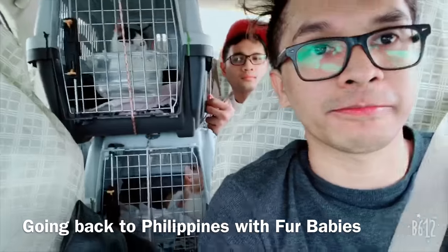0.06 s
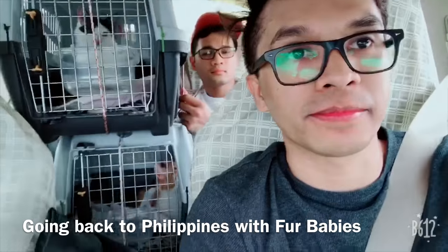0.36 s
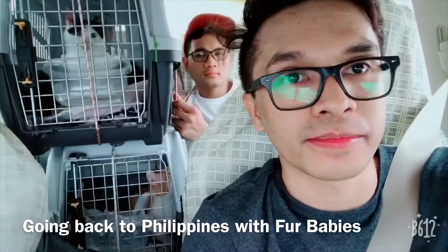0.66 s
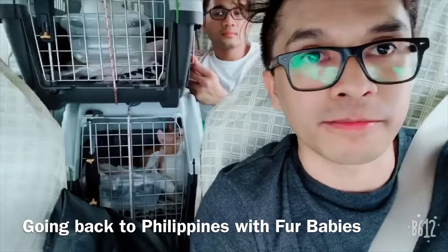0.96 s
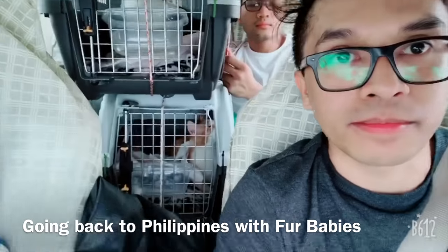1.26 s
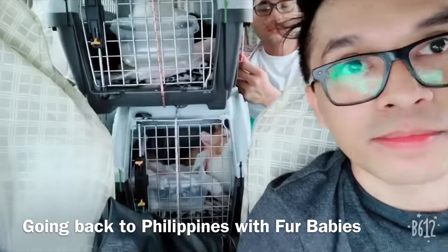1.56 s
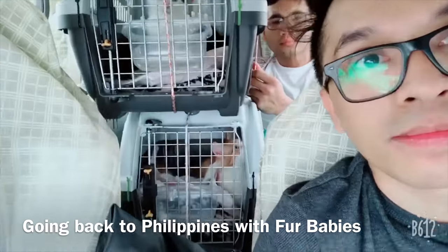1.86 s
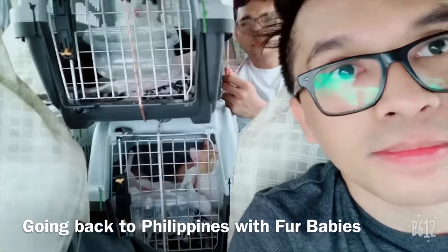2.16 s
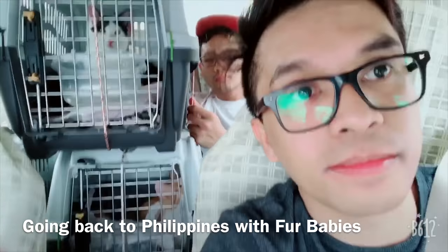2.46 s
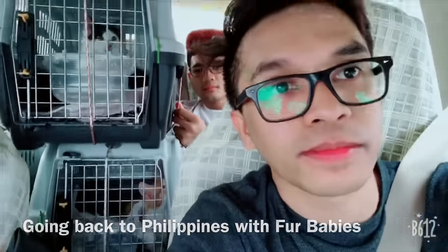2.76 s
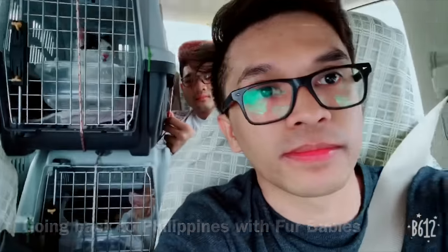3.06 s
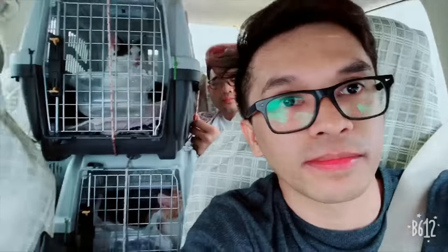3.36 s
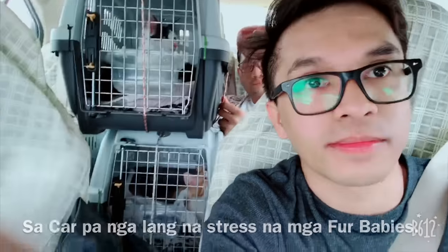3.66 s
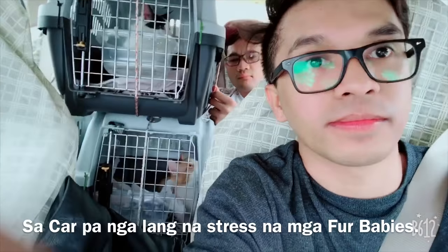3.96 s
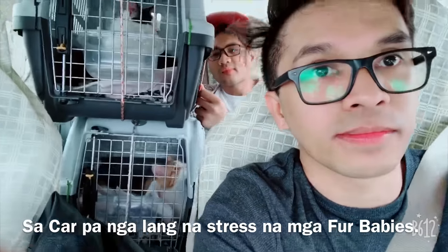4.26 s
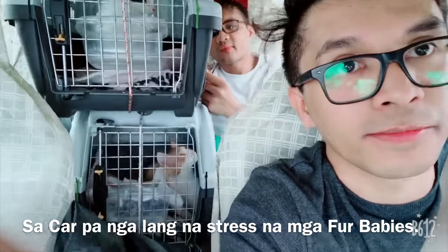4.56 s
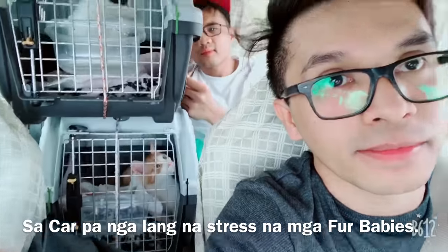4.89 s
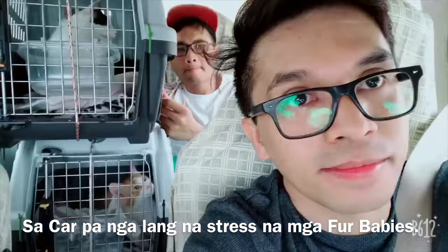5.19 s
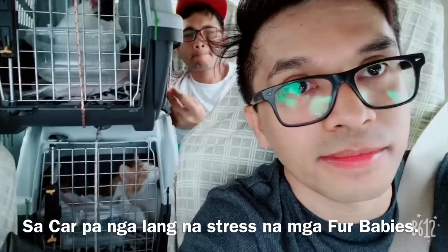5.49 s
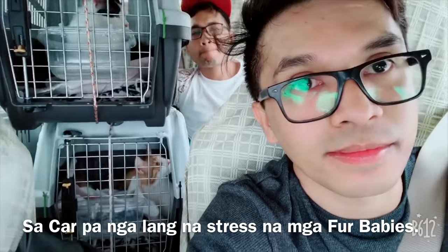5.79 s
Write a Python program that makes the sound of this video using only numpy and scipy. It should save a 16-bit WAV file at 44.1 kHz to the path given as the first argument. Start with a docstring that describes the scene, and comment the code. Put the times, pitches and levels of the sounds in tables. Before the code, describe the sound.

A car cabin rumbles steadily on the road while an indicator ticks briefly and pet carriers click, clack and rattle softly.

```python
"""Inside a moving car. The road drives the cabin's lowest air mode into a boom, panels rumble, tyres roar,
air hisses, and the engine's firing note drones up and down. The turn indicator ticks five times in the
dashboard and its stalk snaps back. Plastic pet carriers snap and knock, their wire doors jingle and
squeak faintly, and clothes brush the seats."""
import sys
import numpy as np
from scipy import signal
from scipy.fft import rfft, irfft, next_fast_len
from scipy.io import wavfile
from scipy.ndimage import map_coordinates

SR = 44100
rng = np.random.default_rng(int(sys.argv[2]) if len(sys.argv) > 2 else 0)


def wrap_up_sound(samples):
    """Save the sound to the file named by the first command line argument, as 16-bit audio."""
    columns = np.atleast_2d(samples).T
    # keep every value between -1 and 1, then stretch to whole-number steps
    tamed = np.clip(columns, -1, 1)
    steps = np.round(tamed * 32767).astype(np.int16)
    wavfile.write(sys.argv[1], SR, steps)


N = 261513

# Spectrum of snapping plastic. Each row: frequency in Hz, level in dB.
PLASTIC_SPECTRUM = [(200, -65.5), (700, -30.5), (1050, -3.5), (1500, 7), (2000, 4), (2500, -2),
                    (3100, -4.5), (3700, -2), (5000, -10), (6400, -15.5), (8000, -25), (11000, -26.5),
                    (15500, -30.5)]
# Spectrum of cloth on upholstery. Each row: frequency in Hz, level in dB.
CLOTH_SPECTRUM = [(2000, 10), (4200, 1), (5000, -1), (6500, -1), (8200, -6), (10000, -8), (12000, -3.5),
                  (14500, -8), (15800, -11.5)]


def amp(db):
    """Decibels to gain."""
    return 10 ** (np.asarray(db) / 20)


def unit(x):
    """Scale to rms 1."""
    return x / np.sqrt(np.mean(x ** 2) + 1e-20)


def along(points, hz):
    """(Hz, value) points read on a log axis."""
    f, v = np.transpose(points)
    return np.interp(np.log(hz + 1), np.log(f + 1), v)


def curves(rows):
    """One value per sample for each column after the time."""
    s, *cols = np.transpose(rows)
    return [np.interp(np.arange(N) / SR, s, c) for c in cols]


def wobble(rate_hz):
    """Smooth random curve, rate_hz knots a second."""
    knots = rng.standard_normal(int(N * rate_hz / SR) + 4)
    return map_coordinates(knots, [np.arange(N) * rate_hz / SR])


def noise(colour, size):
    """Noise of rms 1 with spectrum colour(Hz) in dB."""
    m = next_fast_len(size + 4096)
    gain = amp(colour(np.fft.rfftfreq(m, 1 / SR)))
    return unit(irfft(rfft(rng.standard_normal(m)) * gain, m)[:size])


def impulse(colour, size=1024):
    """Minimum-phase click of peak 1 with spectrum colour(Hz) in dB."""
    spectrum_db = np.maximum(colour(np.fft.rfftfreq(size, 1 / SR)), -70)
    cepstrum = irfft(np.log(amp(spectrum_db)))
    click = irfft(np.exp(rfft(2 * cepstrum * (np.arange(size) < size // 2))))
    return click / np.abs(click).max()


def hump(hz, centre_hz, steep_db):
    """Broad resonance in dB, steep_db down one octave off centre."""
    return -steep_db * np.log2((hz + 1) / centre_hz) ** 2


def focused(spectrum, centre_hz, steep_db):
    """Colour function: a spectrum weighted by a hump."""
    return lambda hz: along(spectrum, hz) + hump(hz, centre_hz, steep_db)


def resonance(hz, centre_hz, half_width_hz):
    """Narrow peak of height 1."""
    return 1 / (1 + ((hz - centre_hz) / half_width_hz) ** 2)


def cycle(hz):
    """Running phase of a gliding frequency."""
    return 2 * np.pi * np.cumsum(hz) / SR


def add(track, start_s, sound):
    """Mix a sound into the track."""
    start = max(round(start_s * SR), 0)
    part = track[start:start + len(sound)]
    part += sound[:len(part)]


def ringing(modes, t, scatter_db, detune=0.0):
    """Damped modes; each blow scatters their levels and, with detune, their pitches."""
    chance = rng.standard_normal((len(modes), 2))
    return sum(amp(db + scatter_db * louder - 60 * t / t60_s)
               * np.sin(2 * np.pi * hz * (1 + detune * higher) * t)
               for (hz, db, t60_s), (louder, higher) in zip(modes, chance))


def snap(centre_hz, t60_s, steep_db, attack_s=0.00014):
    """Stiff plastic lets go: a burst of dense, quickly damped modes."""
    t = np.arange(SR // 8) / SR
    burst = noise(focused(PLASTIC_SPECTRUM, centre_hz, steep_db), len(t))
    return amp(-60 * t / t60_s) * (1 - np.exp(-t / attack_s)) * burst


def boom(mode_hz=42.2, wander_hz=1.168, swing_db=4.5, rough=0.22):
    """Tarmac drives the cabin's lowest air mode unevenly; each bump swells it."""
    # Each row: time in seconds, drive level in dB.
    tarmac = [(0.17, -24.5), (0.3, -19), (0.57, -24), (0.82, -17.5), (0.97, -26.5), (1.3, -25.5),
              (2.3, -23.5), (3.1, -21.5), (3.25, -29.5), (3.45, -21), (4.7, -21.5), (5.27, -29),
              (5.52, -20)]
    # Each row: start in seconds, length in seconds, level in dB.
    bumps = [(0.0, 0.097, -16), (0.23, 0.26, -27), (0.43, 0.072, -21), (1.105, 0.21, -16),
             (1.411, 0.1, -17), (1.745, 0.12, -16.5), (2.545, 0.13, -15.5), (2.715, 0.23, -17),
             (3.693, 0.089, -17.5), (3.925, 0.33, -23), (4.761, 0.16, -13), (5.014, 0.1, -14.5)]
    tarmac_db, = curves(tarmac)
    swing = amp(tarmac_db) * unit(amp(swing_db * np.tanh(wobble(14))))
    jolts = np.zeros(N)
    for start_s, length_s, db in bumps:
        add(jolts, start_s, amp(db) * signal.windows.cosine(int(length_s * SR)))
    phase = cycle(mode_hz + wander_hz * wobble(3.6)) + 2 * rough * wobble(29)
    return np.sqrt(2) * np.hypot(swing, jolts) * (1 + rough * wobble(30)) * np.sin(phase)


def road(thrum_hz=187, roar_db_per_s=1.1648, hiss_db_per_s=0.47):
    """Panels rumble and the floor thrums; tyre roar and air hiss grow as the car gathers speed."""
    # Each row: frequency in Hz, level in dB.
    panel_spectrum = [(18, -31), (30, -25), (52, -19), (64, 6.5), (75, 7.5), (86, 6), (100, -4.5), (120, 3),
                      (150, -6.5), (185, -12.5), (230, -26.5), (320, -65.5), (500, -120)]
    tyre_spectrum = [(60, -120), (120, -42.5), (190, -11), (225, 0), (270, 1.5), (310, 0.5), (345, -1.5),
                     (400, -5), (480, -11), (600, -12.5), (800, -18.3), (1000, -18.5), (1500, -32),
                     (6000, -90.5)]
    air_spectrum = [(100, -63.5), (600, 9.5), (1100, 6), (1600, 3.5), (2200, -2), (2700, -1.5), (3400, -5),
                    (4200, -8.5), (4900, -14), (5600, -11), (6900, -12), (7800, -19.5), (9500, -19.5),
                    (10500, -29), (15500, -29)]
    # Each row: time in seconds, level in dB.
    panel_shake = [(0.1, -25.5), (0.6, -27), (2.3, -28), (3.0, -26), (3.33, -22), (3.55, -26.5), (4.7, -27),
                   (5.3, -25), (5.8, -25)]
    coarse_tarmac = [(0.8, 0), (1.3, 1), (2.2, 0), (3.3, 0), (4.8, -0.5), (5.2, 0.8), (5.55, 1), (5.85, 2)]
    floor_thrum = [(3.9, -60), (4.4, -47), (5.3, -44.5), (5.85, -36.5)]
    # Each row: centre in Hz, half-width in Hz, gain in dB.
    cabin_modes = [(225.3, 7, 4), (256.2, 8.7, 4.5), (342.5, 10, 5.5), (597, 17, 2)]

    def roar_colour(hz):
        peaks_db = sum(db * resonance(hz, centre, width) for centre, width, db in cabin_modes)
        return along(tyre_spectrum, hz) + peaks_db

    t = np.arange(N) / SR
    shake_db, = curves(panel_shake)
    coarse_db, = curves(coarse_tarmac)
    thrum_db, = curves(floor_thrum)
    rumble = amp(shake_db + 1.68 * wobble(7)) * noise(lambda hz: along(panel_spectrum, hz), N)
    roar = amp(-44.5 + roar_db_per_s * t + coarse_db + wobble(25)) * noise(roar_colour, N)
    thrum = amp(thrum_db) * noise(lambda hz: hump(hz, thrum_hz, 18), N)
    hiss_db = -59 + hiss_db_per_s * t + 0.68 * wobble(26)
    hiss = amp(hiss_db) * noise(lambda hz: along(air_spectrum, hz), N)
    return rumble + roar + thrum + hiss


def engine(octave_db=-28, rough=0.09, waver_rad=0.3):
    """Firing note through the bulkhead; its octave swells on crossing a cabin resonance."""
    # Louder under throttle. Each row: time in seconds, pitch in Hz, level in dB.
    firing = [(0.54, 118.4, -59), (0.64, 121.8, -24.5), (0.72, 128.4, -29), (1.0, 137.6, -32.5),
              (1.5, 137.5, -27.5), (2.0, 132.7, -28), (2.52, 140.5, -27.5), (2.72, 127.5, -31),
              (2.95, 120.4, -41.5), (3.45, 119.9, -44), (3.72, 118, -30), (4.05, 121.9, -26),
              (4.35, 128.2, -29), (4.7, 134.9, -28), (5.15, 145.9, -36), (5.38, 157.5, -32.5),
              (5.55, 135, -56), (5.7, 117, -33.5), (5.93, 116, -30)]
    # Each row: centre in Hz, half-width in Hz, gain in dB.
    cabin_modes = [(255.7, 5.5, 19.5)]
    hz, db = curves(firing)
    boost = 1 + sum(amp(gain) * resonance(2 * hz, centre, width) for centre, width, gain in cabin_modes)
    phase = cycle(hz) + rough * wobble(30)
    octave = amp(octave_db) * boost * np.sin(2 * phase + waver_rad * wobble(35))
    return np.sqrt(2) * amp(db) * (np.sin(phase) + octave) * (1 + rough * wobble(40))


def rubs(gain_db=2, grain_db=3.0, sleeve_hz=7200):
    """Cloth and plastic rub with a stick-slip grain; a sleeve stirs faintly."""
    # Each row: start in seconds, length in seconds, level in dB, centre in Hz.
    strokes = [(0.146, 0.06, -64.5, 6040), (0.381, 0.14, -66.5, 11600), (1.026, 0.3, -70, 5800),
               (1.305, 0.031, -59, 7400), (1.651, 0.068, -57, 3230), (1.657, 0.049, -67, 11160),
               (1.601, 0.5, -77, 11910), (1.852, 0.1, -69.5, 5200), (2.028, .05, -67.5, 6000),
               (3.927, 0.09, -59.5, 3850), (4.083, .17, -73.5, 11200), (4.243, 0.024, -65, 11400),
               (4.27, 0.089, -70, 6180), (4.45, 0.035, -52.5, 21200), (4.481, 0.11, -74.5, 12400),
               (5.051, 0.082, -62.5, 2651), (5.335, 0.09, -56, 2996), (5.374, 0.032, -51.5, 2800)]
    # Each row: time in seconds, level in dB.
    stirring = [(0.03, -64), (0.17, -70), (1, -72.5), (1.8, -71), (3, -80.5)]
    out = np.zeros(N)
    for start_s, length_s, db, centre_hz in strokes:
        swell = signal.windows.cosine(int(length_s * SR))
        friction = noise(focused(CLOTH_SPECTRUM, centre_hz, 9), SR // 2)
        add(out, start_s, amp(db + gain_db) * swell * friction[:len(swell)])
    stirring_db, = curves(stirring)
    sleeve = amp(stirring_db + 2 * wobble(12)) * noise(focused(CLOTH_SPECTRUM, sleeve_hz, 2.3), N)
    return (out + sleeve) * amp(grain_db * wobble(220))


def crinkles(gain_db=-6, centre_hz=7000, t60_s=0.028, attack_s=0.0014):
    """Fabric creases give way in papery flicks as an arm moves."""
    # Each row: start in seconds, level in dB.
    creases = [(.086, -46), (.177, -51), (.189, -44), (.211, -48), (.282, -46), (.307, -45.5),
               (.335, -43.5), (.35, -48)]
    out, t = np.zeros(N), np.arange(SR // 8) / SR
    for start_s, db in creases:
        flick = noise(focused(CLOTH_SPECTRUM, centre_hz, 22), len(t))
        add(out, start_s, amp(db + gain_db - 60 * t / t60_s) * (1 - np.exp(-t / attack_s)) * flick)
    return out


def hinge(rough_rad=1.2, t60_s=0.075, attack_s=0.0035):
    """Wire slips on wire, catches and slips again: a thin, rough squeak."""
    # Each row: start in seconds, level in dB.
    slips = [(3.066, -61), (3.087, -60)]
    # Each row: frequency in Hz, level in dB.
    partials = [(11870, -7), (14200, 0)]
    envelope, t = np.zeros(N), np.arange(N) / SR
    for start_s, db in slips:
        add(envelope, start_s, amp(db - 60 * t / t60_s) * (1 - np.exp(-(t / attack_s) ** 2)))
    squeak = sum(amp(db) * np.sin(2 * np.pi * hz * t + rough_rad * wobble(500)) for hz, db in partials)
    return envelope * squeak


def wire_door(gain_db=-7.5, scrape_db=-7, scrape_t60_s=0.085, attack_s=0.002):
    """A wire door rattles on its frame; chatter blurs the pitch of the ringing bars."""
    # Each row: start in seconds, level in dB, centre in Hz.
    touches = [(5.73, -38.5, 17200), (5.738, -45.5, 10950), (5.752, -50.5, 11500), (5.772, -49, 11500),
               (5.778, -40, 6300), (5.811, -37, 5700), (5.839, -53, 8000), (5.866, -45, 8950)]
    # Each row: frequency in Hz, level in dB, t60 in seconds.
    bar_modes = [(4260, -6, .04), (5400, -7, 0.068), (6050, -12, 0.06), (7240, -11, 0.043),
                 (9560, -10, 0.05), (11450, -17, .05), (13600, -7, .04), (14500, -5, 0.033),
                 (15400, -12, .04)]
    out, t = np.zeros(N), np.arange(SR // 6) / SR
    for start_s, db, centre_hz in touches:
        struck = [(hz, level + hump(hz, centre_hz, 2), t60_s) for hz, level, t60_s in bar_modes]
        ring = ringing(struck, t, scatter_db=2, detune=0.004) * 2 / np.sqrt(len(bar_modes))
        chatter = 1 + 0.9 * noise(lambda hz: hump(hz, 170, 9), len(t))
        friction = noise(focused(CLOTH_SPECTRUM, centre_hz, 4.6), len(t))
        scrape = amp(scrape_db - 60 * t / scrape_t60_s) * friction
        add(out, start_s, amp(db + gain_db) * (ring * chatter + scrape) * (1 - np.exp(-t / attack_s)))
    return out


def latch(ring_db=-7, rattle_db=-13, attack_s=0.0004):
    """A door latch knocks in its plastic socket: a crack, then ring and rattle, weaker if held fast."""
    # Each row: start in seconds, level in dB, crack centre in Hz, ring and rattle gain in dB.
    knocks = [(0.646, -44, 12900, -36), (.663, -34, 12000, -22), (2.123, -35, 3000, -19),
              (2.5424, -40, 4600, -16), (3.5804, -34.5, 4530, -6.5), (3.6315, -39, 2390, -23),
              (4.678, -48, 3403, -11), (4.7374, -40.5, 3001, -1)]
    # Each row: frequency in Hz, level in dB.
    crack_spectrum = [(700, -30), (1500, -7.5), (2400, 3), (3400, 2.5), (4800, -11), (5600, -5.5),
                      (7500, -13), (9200, -12), (11000, -18.5), (15500, -20.5)]
    # Each row: frequency in Hz, level in dB, t60 in seconds.
    latch_modes = [(2470, -12.5, .025), (2620, 5.5, 0.037), (3320, 1, 0.02), (3600, -9, .022),
                   (4350, -25, .025), (5850, -17.5, 0.027), (6900, -24, .025)]
    out, t = np.zeros(N), np.arange(SR // 8) / SR
    for start_s, db, centre_hz, free_db in knocks:
        ring = ringing(latch_modes, t, scatter_db=1.5, detune=0.015) * (1 - np.exp(-t / attack_s))
        rattle = snap(centre_hz, t60_s=0.035, steep_db=5.5)
        add(out, start_s, amp(db) * impulse(focused(crack_spectrum, centre_hz, 3)))
        add(out, start_s, amp(db + free_db) * (amp(ring_db) * ring + amp(rattle_db) * rattle))
    return out


def plastic_snaps(gain_db=-4):
    """Single snaps of the indicator stalk and the carrier shells."""
    # Each row: start in seconds, level in dB, centre in Hz, t60 in seconds.
    snaps = [(1.3043, -35, 2220, 0.058), (1.3162, -31.5, 1500, 0.032), (1.3246, -31.5, 2170, 0.05),
             (1.6, -47.5, 3000, 0.014), (1.636, -45, 2800, .02), (1.657, -44, 2700, .03),
             (1.671, -45, 2300, 0.038), (1.818, -43, 1390, 0.028), (2.5381, -45.5, 4000, 0.046),
             (4.249, -51, 11000, .04), (4.291, -51.5, 7000, 0.025), (4.456, -54, 9100, .06)]
    out = np.zeros(N)
    for start_s, db, centre_hz, t60_s in snaps:
        add(out, start_s, amp(db + gain_db) * snap(centre_hz, t60_s, steep_db=6))
    return out


def carrier_clack(gain_db=-12, rasp_db=6, ring_attack_s=0.00083):
    """One carrier hits the other and rebounds; both blows rasp and ring the shell."""
    # Each row: start in seconds, level in dB, centre in Hz.
    blows = [(5.3842, -23.5, 3265), (5.391, -28, 2200)]
    # Each row: frequency in Hz, level in dB, t60 in seconds.
    shell_modes = [(1100, -8, .03), (1560, -2, 0.049), (2020, 3.5, 0.034), (2305, -6, .038),
                   (2658, -8, 0.048), (2870, -3, 0.028), (3350, -1, 0.033), (3530, -9, .028),
                   (4740, -31, .035), (5700, -22, .04)]
    out, t = np.zeros(N), np.arange(SR // 8) / SR
    for start_s, db, centre_hz in blows:
        struck = [(hz, level + hump(hz, centre_hz, 3.5), t60_s) for hz, level, t60_s in shell_modes]
        ring = ringing(struck, t, scatter_db=1.5) * (1 - np.exp(-t / ring_attack_s))
        rasp = amp(rasp_db) * snap(centre_hz, t60_s=0.019, steep_db=4.5, attack_s=0.0008)
        add(out, start_s, amp(db + gain_db) * (ring + rasp))
    return out


def indicator(gain_db=9, overtone_db=-23, overtone_t60_s=0.051, click_db=-24, click_t60_s=0.084):
    """Each tick is a hollow pulse in the dashboard; tick and tock differ in their overtone."""
    # Each row: start in seconds, level in dB, overtone in Hz.
    ticks = [(.137, -36, 6430), (0.485, -36.5, 5500), (0.837, -35.5, 6250), (1.1862, -36.5, 5580),
             (1.3753, -36.5, 6300)]
    # Each row: frequency in Hz, level in dB, t60 in seconds.
    dash_modes = [(757, 7.5, 0.023), (1950, -13, 0.02), (2150, -19, 0.049), (3380, -18, 0.02),
                  (3660, -28, 0.047)]
    out, t = np.zeros(N), np.arange(SR // 8) / SR
    onset = 1 - np.exp(-(t / 0.003) ** 2)
    ring = sum(amp(db - 60 * t / t60_s) * np.sin(2 * np.pi * hz * t) for hz, db, t60_s in dash_modes)
    for start_s, db, overtone_hz in ticks:
        blur = 1 + 0.88 * noise(lambda hz: hump(hz, 150, 8), len(t))  # close reflections
        overtone = amp(overtone_db - 60 * t / overtone_t60_s) * np.sin(2 * np.pi * overtone_hz * t)
        burst = noise(lambda hz: along(PLASTIC_SPECTRUM, hz), len(t))
        click = amp(click_db - 60 * t / click_t60_s) * burst
        add(out, start_s, amp(db + gain_db) * (ring + blur * overtone + click) * onset)
    return out


def cabin_reverb(x):
    """The upholstered cabin answers 4 ms later with a very short tail."""
    # Each row: frequency in Hz, t60 in seconds.
    decay = [(200, 0.093), (2000, 0.036), (12000, 0.092)]
    hz, t, spectra = signal.stft(rng.standard_normal(SR // 4), SR, nperseg=256)
    tail = signal.istft(spectra * amp(-60 * t / along(decay, hz)[:, None]), SR, nperseg=256)[1]
    return signal.fftconvolve(np.pad(x, (SR // 250, 0)), tail / np.linalg.norm(tail))[:N]


def scene():
    """Small nearby sounds over the noise of the drive, mono."""
    drive = boom() + engine() + road()
    near = indicator() + plastic_snaps() + latch() + carrier_clack() + wire_door() + hinge()
    near += crinkles() + rubs()
    return (drive + near + amp(-13.0) * cabin_reverb(near))[None]


def record(dry, top_hz=15800):
    """Brief fades at both ends; nothing passes above top_hz."""
    fades = signal.windows.tukey(N, 0.003)
    m = next_fast_len(N + SR // 2)
    passband = np.fft.rfftfreq(m, 1 / SR) < top_hz
    return irfft(rfft(dry * fades, m) * passband, m)[..., :N]


dry = scene()
out = record(dry)
wrap_up_sound(out)
```